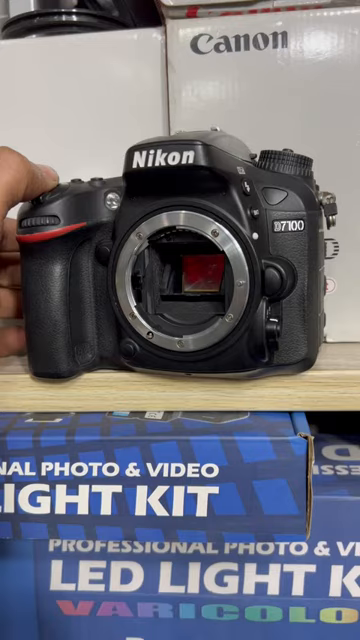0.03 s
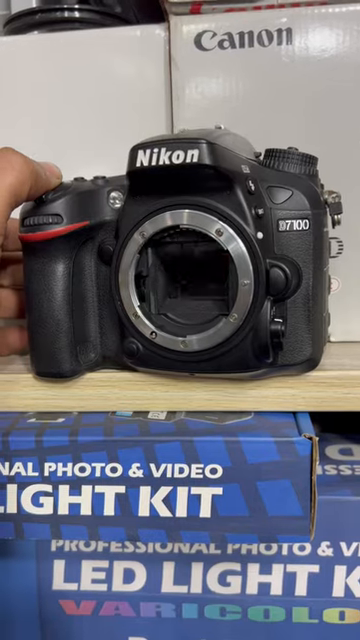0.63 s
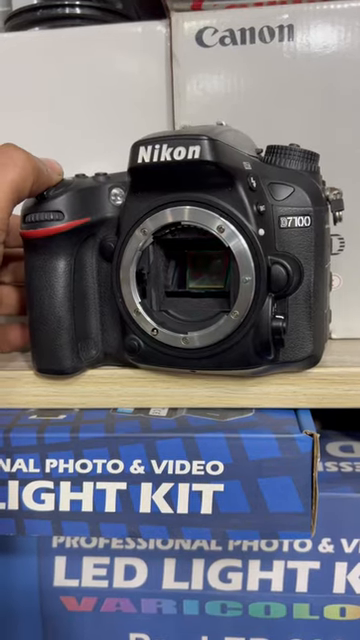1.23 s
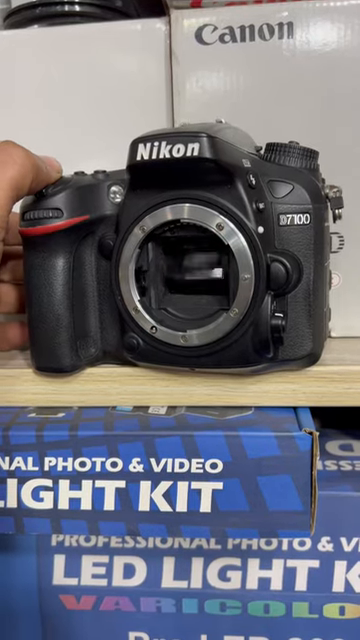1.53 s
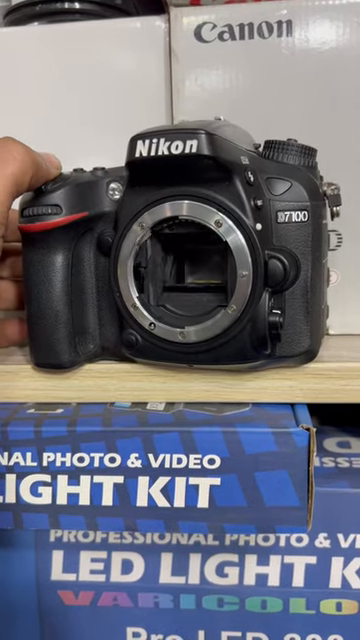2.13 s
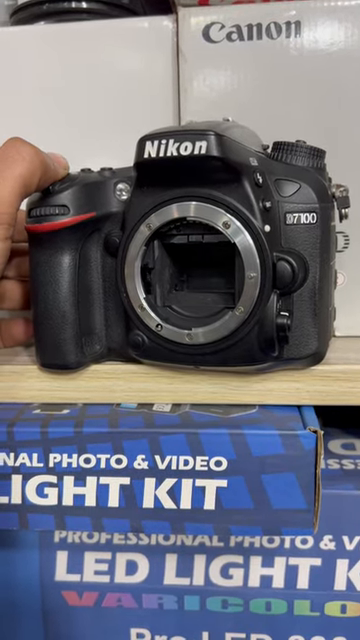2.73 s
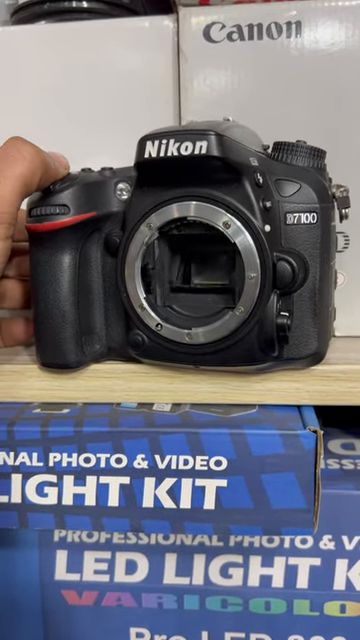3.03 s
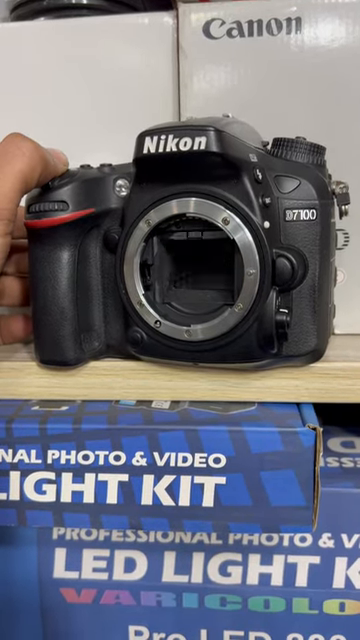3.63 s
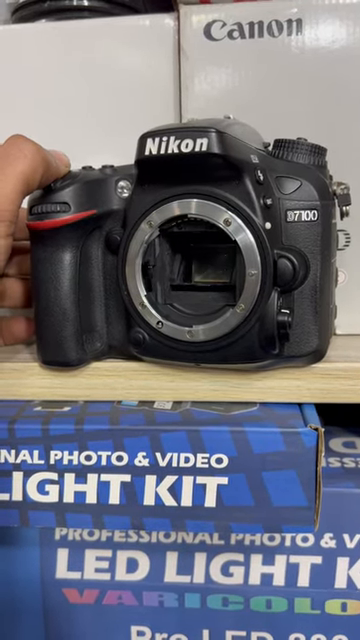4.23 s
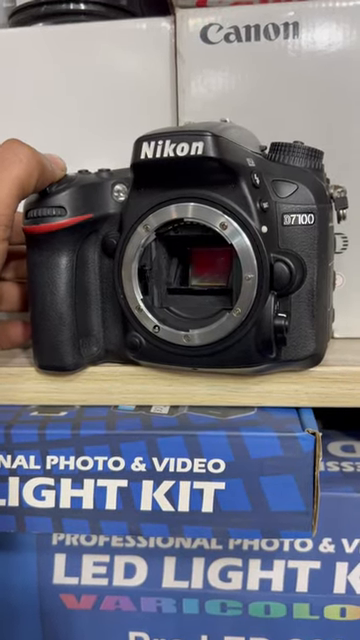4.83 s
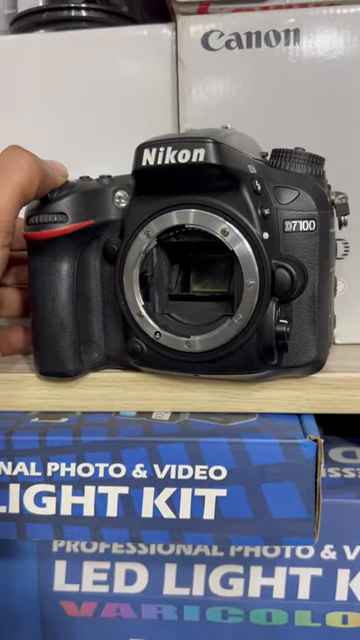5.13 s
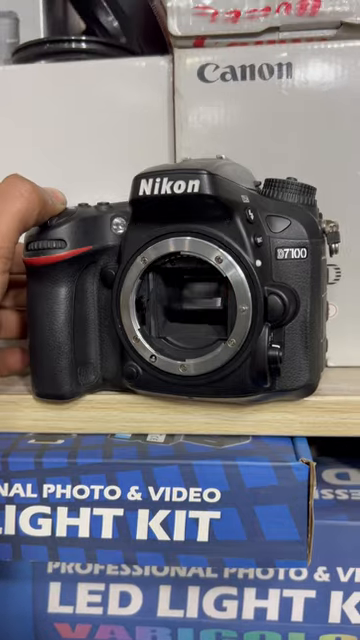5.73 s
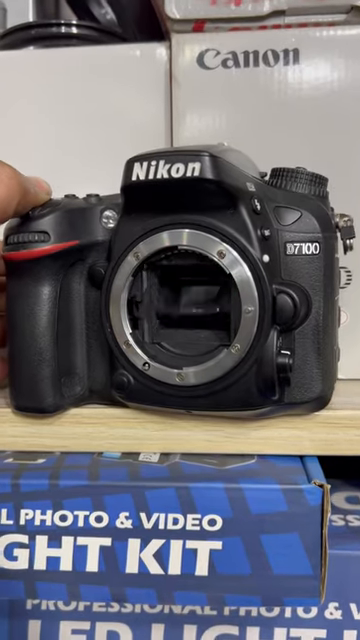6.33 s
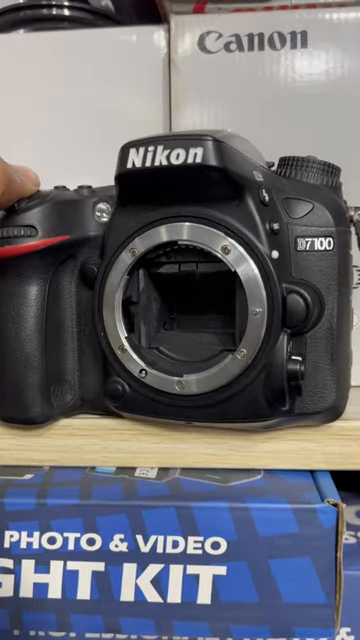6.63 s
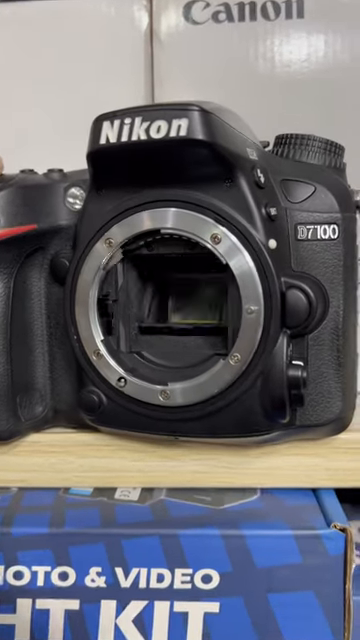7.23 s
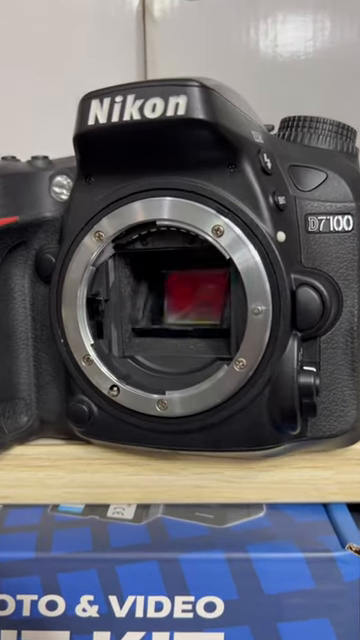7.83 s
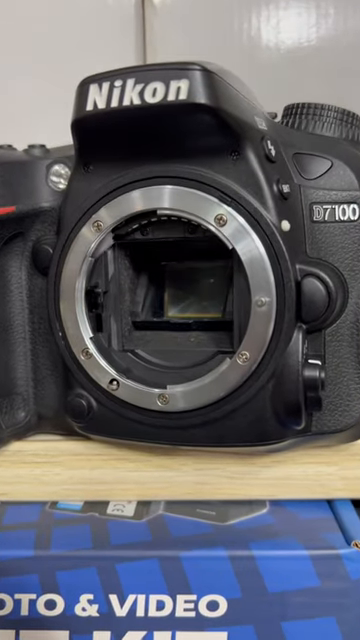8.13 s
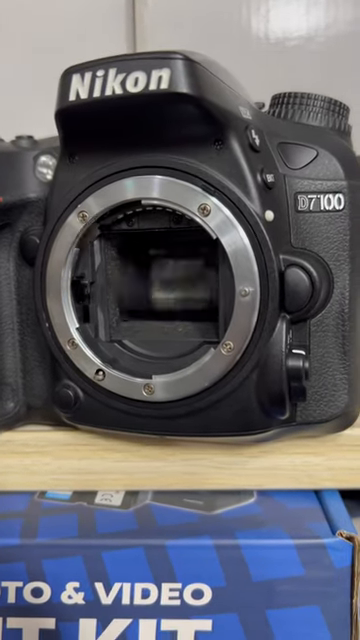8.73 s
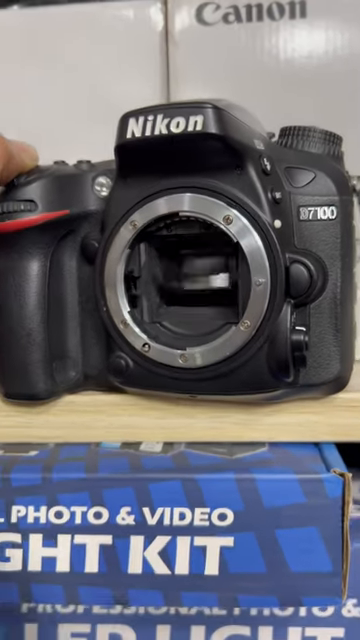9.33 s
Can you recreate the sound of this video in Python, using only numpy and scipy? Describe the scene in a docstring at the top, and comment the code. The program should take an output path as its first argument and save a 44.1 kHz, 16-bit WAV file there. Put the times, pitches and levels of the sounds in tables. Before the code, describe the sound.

A close camera mirror and shutter clack in a rapid, steady burst over a faint traffic rumble in a small shop.

```python
"""A hand-held reflex camera without a lens shoots a long burst, close by in a small shop.
In every frame a motor trips the mirror up, two shutter curtains snap, the mirror falls and the gears
cock and latch again. Each blow is a short rattle ringing through the struck part, over a low ring of
body and shelf. Street rumble comes through the walls, one engine goes by, and a faint squeal comes late."""
import sys
import numpy as np
from scipy import signal
from scipy.fft import rfft, irfft, next_fast_len
from scipy.io import wavfile
from scipy.ndimage import uniform_filter1d

SR = 44100
rng = np.random.default_rng(int(sys.argv[2]) if len(sys.argv) > 2 else 0)


def transcribe(u):
    """Save the signal u as a 16-bit wav file named by the first command-line argument.

    u: samples, shape (n,) or (channels, n), limited to [-1, 1]; the rate is SR.
    q: integer samples, one column per channel.
    """
    v = np.clip(np.atleast_2d(u).T, -1, 1)
    q = np.round(v * 32767).astype(np.int16)
    wavfile.write(sys.argv[1], SR, q)


N = 422478
FRAME_COUNT = 54


def amp(db):
    """Decibels to gain."""
    return 10 ** (np.asarray(db) / 20)


def unit(x):
    """Scale to rms 1."""
    return x / np.sqrt(np.mean(x ** 2) + 1e-20)


def along(points, hz):
    """Read a curve of (Hz, value) points on a log frequency axis."""
    knots, values = np.transpose(points)
    return np.interp(np.log(hz + 1), np.log(knots + 1), values)


def curves(rows):
    """Automation: one value per sample for each column after the time."""
    times, *columns = np.transpose(rows)
    return [np.interp(np.arange(N) / SR, times, column) for column in columns]


def filtered(x, response):
    """Filter by a complex response, given as a function of Hz."""
    size = next_fast_len(N + SR // 2)
    return irfft(rfft(x, size) * response(np.fft.rfftfreq(size, 1 / SR)), size)[..., :N]


def noise(spectrum):
    """Two unrelated noises of rms 1 with the given colour."""
    return unit(filtered(rng.standard_normal((2, N)), lambda hz: amp(along(spectrum, hz))))


def add(track, start_s, sound):
    """Mix a sound into a track."""
    i = max(round(start_s * SR), 0)
    track[..., i:i + sound.shape[-1]] += sound[..., :max(N - i, 0)]


def frame_times(first_s=.0509, period_s=.177551, slowing_s=5.24e-6, jitter_s=.0002):
    """The beat of the burst: each period is a touch longer than the last as the drive tires."""
    k = np.arange(FRAME_COUNT)
    beats = first_s + period_s * k + slowing_s * k * (k - 1) / 2
    return beats + jitter_s * rng.standard_normal(FRAME_COUNT)


def stroke(ms, length_ms, attack_ms=6.2, surge_db=4, surge_ms=6.2, release_db_per_ms=1):
    """Load of one motor stroke: it surges to get its parts moving, holds and runs down."""
    extra_db = surge_db * np.exp(-np.maximum(ms - attack_ms, 0) / surge_ms)
    release_db = release_db_per_ms * np.maximum(ms - length_ms, 0)
    return np.clip(ms / attack_ms, 0, 1) * amp(extra_db - release_db)


# Trip the mirror, wind, cock. Each row: start in ms from the beat, length in ms, held level in dB.
MOTOR_STROKES = [(-25.5, 40.8, -32.5), (38, 32, -32), (68, 27.8, -31.5)]
# Colour of the gear rasp. Each row: frequency in Hz, level in dB.
GEAR_COLOUR = [(250, -15), (480, -13), (750, -2), (950, -7.5), (1400, -1.5), (1900, 4.5), (2600, 0.5),
               (3600, -7.5), (5300, -11), (6400, 3), (8000, -6), (9200, -8), (10500, -11.5), (15500, -15)]
# Gear tones. Each row: centre in ms from the beat, half length in ms, pitch in Hz, level in dB.
GEAR_WHINES = [(-4.5, 8.9, 3000, -40.5), (-3, 9, 1860, -46), (73, 7, 8600, -45.5)]


def motor(frames):
    """Gear teeth rasp under the motor's load, and sing briefly where it runs free."""
    load, whine = np.zeros(N), np.zeros(N)
    t = np.arange(-.03 * SR, .14 * SR) / SR
    ms = t * 1000
    cycle = np.max([amp(db) * stroke(ms - start, length) for start, length, db in MOTOR_STROKES], axis=0)
    for beat in frames:
        add(load, beat + t[0], cycle)
        for centre_ms, half_ms, hz, db in GEAR_WHINES:
            detuned_hz = hz * (1 + 0.0055 * rng.normal())
            tone = np.sqrt(2) * np.sin(2 * np.pi * (detuned_hz * t + rng.random()))
            swell = np.exp(-((ms - centre_ms) / half_ms) ** 4)
            add(whine, beat + t[0], amp(db) * swell * tone)
    teeth_db = 2.6 * unit(uniform_filter1d(rng.standard_normal(N), size=40))
    return load * unit(amp(teeth_db)) * noise(GEAR_COLOUR) + whine


def part_response(resonances, bass_lag_ms=2.1, bend_hz=804, size=2048):
    """Spectrum of a struck part's ring, energy 1; bending waves bring the bass late."""
    hz = np.fft.rfftfreq(size, 1 / SR) + 1
    power = sum(amp(db) ** 2 / (1 + ((hz - centre * centre / hz) / width) ** 2)
                for centre, width, db in resonances)
    cepstrum = irfft(np.log(power / power.mean() + 1e-9) / 2)
    fold = 1 + np.sign(size // 2 - np.arange(size))  # minimum phase: the ring follows the hit
    fold[0] = 1
    bend = 2 * np.pi * bass_lag_ms / 1000 * bend_hz * np.arctan(hz / bend_hz)
    return np.exp(rfft(cepstrum * fold) - 1j * bend)


def chatter(decay_ms, fresh, size=2048):
    """Spectra (frames, 2, Hz) of a contact's colourless rattle; fresh sets how much each frame varies."""
    whiten = lambda z: z / (np.abs(z) + 1e-20)
    fade = np.exp(-np.arange(size) / SR * 1000 / decay_ms)
    force = fade * (rng.standard_normal((2, size)) + fresh * rng.standard_normal((FRAME_COUNT, 2, size)))
    for _ in range(3):  # flatten the colour while keeping the hit short
        force = irfft(whiten(rfft(force))) * np.sqrt(fade)
    return whiten(rfft(force))


# Brightness of the rising mirror's slap. Each row: time in seconds, treble shelf gain in dB.
SLAP_TREBLE = [(0, 2), (3.3, -5), (5.3, -3), (9, -.5)]


def slap_colour(frames, scatter_db=1.2, shelf_hz=9500, bands=12, size=2048):
    """EQ (frames, 1, Hz) for each slap: the mirror never lands quite the same way."""
    hz = np.fft.rfftfreq(size, 1 / SR)
    knots = np.geomspace(500, 16000, bands)
    draws = rng.standard_normal((FRAME_COUNT, bands))
    ripple = np.array([along(np.transpose([knots, draw]), hz) for draw in draws])
    shelf = 1 - 1 / (1 + (hz / shelf_hz) ** 8)
    treble_db = np.interp(frames, *np.transpose(SLAP_TREBLE))[:, None] * shelf
    return amp(scatter_db * ripple + treble_db)[:, None]


# Resonances of the struck parts; OPENING and CLOSING are the two shutter curtains.
# Each row: frequency in Hz, width in Hz, level in dB.
LEVER = [(715, 320, -11.5), (1060, 120, -10), (1720, 120, 5.5), (2030, 240, -1), (2510, 130, -1.5),
         (3140, 600, -6.5), (6100, 800, -2.5), (9400, 1050, 0)]
MIRROR_UP = [(459, 106, 0.5), (595, 95, -1), (1138, 230, 0), (1700, 74, -3), (2300, 310, -7.5),
             (3714, 410, -3.5), (5000, 1000, -12.5), (6650, 740, -5), (7340, 220, 0.5), (8500, 1040, -6.5),
             (13900, 4100, -9.5)]
CATCH = [(6760, 1600, 3), (9200, 900, 2), (13500, 3500, -6)]
OPENING = [(1460, 220, -1.5), (1990, 72, 0.5), (2370, 250, 2.5), (5370, 150, -2.5), (6160, 260, -7),
           (7350, 240, -4.5), (8900, 230, -1.5), (11200, 1300, -11), (14000, 3000, -12.5)]
CLOSING = [(600, 335, -6.5), (1284, 82, -4), (1590, 350, -8), (2050, 160, -7), (4010, 180, -5),
           (4610, 310, -7.5), (5480, 270, -5), (6180, 190, -4.5), (7160, 470, 2.5), (9090, 240, -3),
           (13780, 2900, -16.5)]
MIRROR_DOWN = [(743, 140, -6), (1310, 100, -5.5), (1690, 62, 1), (2280, 690, -7.5), (3840, 1060, -7.5),
               (6800, 1040, 0), (8750, 590, -2.5), (12400, 4600, -11)]
CUSHION = [(438, 134, -1.5), (580, 81, -1.3), (750, 64, 0.75)]
LATCH = [(990, 240, -2.5), (1310, 140, 0), (2100, 180, -3.5), (2400, 140, 2), (5800, 190, -10),
         (6760, 1400, -13.5), (9050, 860, -7.5), (13780, 1700, -46)]
# The kit of parts. Each entry: part name, its resonances.
PARTS = {"lever": LEVER, "up": MIRROR_UP, "open": OPENING, "close": CLOSING, "down": MIRROR_DOWN, "cushion":
         CUSHION, "catch": CATCH, "latch": LATCH}
# The hits of one frame. Each row: part, start in ms from the beat, base level in dB,
# rattle decay in ms, timing scatter in ms.
CONTACTS = [("lever", -18, -6.5, .6, .3), ("lever", -15.5, -8.5, 0.94, 0.33), ("down", 3.1, 0, 1.3, .15),
            ("up", 4.2, 9.1, 1.7, .3), ("catch", 7.5, -3, 3.3, .5), ("catch", 27, -6, 3, .2),
            ("open", 27.3, 4.9, 1.28, .06), ("close", 39.8, 7.14, 0.59, .05),
            ("close", 40.9, 7.4, 1.54, .06), ("down", 70.6, 0, 0.86, 0.11), ("cushion", 70.8, -3, 0.75, .1),
            ("down", 74.4, 1.2, 0.88, .2), ("down", 76.5, 1.7, 3, .4), ("down", 84.2, -18, 2.2, 0.57),
            ("latch", 95, -1.7, 1.51, .3), ("lever", 103.2, -14.5, 1.27, .5)]


def blows(frames, clack_samples=1500):
    """Levers, mirror and curtains hit their stops in the same order in every frame."""
    slap_start_db, slap_fall_db_per_s = 0.76, 0.16  # the rising mirror slowly eases off
    snap_soft_db, snap_settle_s = 3, 0.91  # the closing curtain starts soft, then hits evenly
    track = np.zeros((2, N))
    bodies = {part: part_response(resonances) for part, resonances in PARTS.items()}
    bodies["up"] = bodies["up"] * slap_colour(frames)
    for part, ms, db, decay_ms, scatter_ms in CONTACTS:
        rattle = chatter(decay_ms, fresh=.3 + 1.31 * scatter_ms)  # loose contacts repeat less exactly
        clacks = irfft(rattle * bodies[part])[..., :clack_samples]
        for beat, clack, (late, hard) in zip(frames, clacks, rng.standard_normal((FRAME_COUNT, 2))):
            slap_db = slap_start_db - slap_fall_db_per_s * beat + hard
            snap_db = .5 * hard - snap_soft_db * np.exp(-beat / snap_settle_s)
            accent_db = {"up": slap_db, "close": snap_db}.get(part, 1.8 * scatter_ms * hard)
            add(track, beat + (ms + scatter_ms * late) / 1000, amp(db + accent_db) * clack)
    return track


# Low modes of body and shelf. Each row: pitch in Hz, base level in dB, seconds to fall 60 dB.
BODY_MODES = [(229, -47, 0.38), (409, -50.5, 0.08), (572, -44, 0.076), (744.4, -38, 0.11)]


def body_ring(frames):
    """The mirror's two blows and the closing curtain leave the body and the shelf ringing low."""
    track, t = np.zeros(N), np.arange(SR // 3) / SR
    attack = 1 - np.exp(-t / 0.0011)
    for beat in frames:
        for after_s, hit_db in [(.008, 3), (.043, 1), (.075, 2)]:  # mirror up, curtain, mirror down
            ring = sum(amp(hit_db + db - 60 * t / t60) * np.sin(2 * np.pi * (hz * t + rng.random()))
                       for hz, db, t60 in BODY_MODES)
            add(track, beat + after_s, ring * attack)
    return track


# Decay of the shop's reverb. Each row: frequency in Hz, seconds to fall 60 dB.
SHOP_DECAY = [(300, 0.26), (2000, 0.22), (7000, 0.28), (15000, 0.17)]


def shop_reverb(source, frames, build_s=0.002, tail_count=4):
    """A short room tail; it drifts from frame to frame as the camera moves."""
    hz, t, spectra = signal.stft(rng.standard_normal((tail_count, 2, SR // 3)), SR, nperseg=256)
    colour = amp(along([(150, 5.5), (2000, 1), (7000, -1.5), (15000, -1.5)], hz))
    decay = amp(-60 * t / along(SHOP_DECAY, hz)[:, None])
    tails = signal.istft(spectra * colour[:, None] * decay, SR, nperseg=256)[1]
    tails *= 1 - np.exp(-(np.arange(tails.shape[-1]) / SR / build_s) ** 2)
    tails /= np.linalg.norm(tails, axis=-1, keepdims=True)
    draws = rng.standard_normal((tail_count, FRAME_COUNT))
    sends = np.array([np.interp(np.arange(N) / SR, frames, draw) for draw in draws])
    sends /= np.linalg.norm(sends, axis=0)  # equal-power crossfade between the tails
    return sum(signal.oaconvolve((source * send)[None], tail, axes=1)[:, :N]
               for send, tail in zip(sends, tails))


# Swell of the traffic. Each row: time in seconds, level in dB.
RUMBLE_LEVEL = [(0, -48), (.3, -41), (2.6, -42), (3.3, -39.5), (4.6, -40.5), (5.7, -39.5), (6.5, -38),
                (7.8, -40), (9.5, -41)]
# Colours of the traffic and of the shop air. Each row: frequency in Hz, relative level in dB.
RUMBLE_COLOUR = [(20, -36), (32, -18), (48, -5), (65, -3.5), (90, 2), (135, -3), (170, -11.5), (300, -21),
                 (700, -60)]
AIR_COLOUR = [(60, -15), (250, 0.5), (1000, -18), (3000, -4), (15000, -31)]


def street_and_air():
    """The bed: traffic rumbles through the walls and the shop air hisses faintly."""
    rumble_db, = curves(RUMBLE_LEVEL)
    return amp(rumble_db) * noise(RUMBLE_COLOUR) + amp(-52.5) * noise(AIR_COLOUR)


# The engine's pass-by. Each row: time in seconds, firing rate in Hz, level in dB.
ENGINE_PASS = [(2.7, 86, -51), (3.0, 88.4, -37.5), (3.3, 90.6, -31), (3.5, 92.5, -31.5), (3.6, 91.7, -45),
               (3.7, 92.6, -34), (4.0, 89.4, -40), (4.25, 86.7, -62)]
# Its partials. Each row: multiple of the firing rate, relative level in dB.
ENGINE_ORDERS = [(.5, -15), (1, 2), (1.5, -16), (3, -21)]


def passing_engine():
    """An engine's firing makes a low hum that rises and falls in pitch and level as it goes by."""
    firing_hz, level_db = curves(ENGINE_PASS)
    phase = 2 * np.pi * np.cumsum(firing_hz) / SR
    return amp(level_db) * unit(sum(amp(db) * np.sin(order * phase) for order, db in ENGINE_ORDERS))


# A faint, thin squeal. Each row: pitch in Hz, relative level in dB.
SQUEAL_TONES = [(2762, 0), (3235, -2)]


def squeal(centre_s=7.9, half_s=0.27, level_db=-45):
    """Two thin, slightly unsteady tones rise and fade in the background."""
    swell = np.exp(-((np.arange(N) / SR - centre_s) / half_s) ** 2)
    waver = unit(uniform_filter1d(rng.standard_normal(N), size=600))
    clock = np.cumsum(1 + 0.0059 * waver) / SR
    tones = sum(amp(db) * np.sin(2 * np.pi * hz * clock) for hz, db in SQUEAL_TONES)
    return amp(level_db) * swell * unit(tones)


# Stereo phase. Each row: frequency in Hz, lead of the left side in radians.
LEFT_LEAD = [(1200, -0.023), (4500, 0.42), (6300, -1.06), (8000, -0.99), (9200, -1.45), (15000, -1.5)]


def stereo_ports(pair, width):
    """Two microphone ports hear the bass alike; the top end differs and reaches the left one later."""
    def mid_side_gains(hz):
        angle = along(width, hz)
        return np.array([np.cos(angle), np.sin(angle)])

    mid, side = filtered(pair, mid_side_gains)
    left_right = np.array([mid + side, mid - side])
    return filtered(left_right, lambda hz: np.exp(.5j * along(LEFT_LEAD, hz) * np.array([[1], [-1]])))


# Closeness of the hand-held camera. Each row: time in seconds, gain in dB.
CLOSENESS = [(0, -0.23), (2, -0.2), (3, -0.74), (5, -0.65), (6.3, 0), (7.5, 1), (8.5, 0.6), (9.5, -0.5)]
# Stereo width of the direct sound and of the ambience. Each row: frequency in Hz, mid/side angle in radians.
DIRECT_WIDTH = [(100, 0.016), (650, 0.092), (1400, 0.023), (3000, 0.17), (15000, 0.4)]
AMBIENT_WIDTH = [(90, 0.013), (250, 0.097), (600, 0.57), (2000, 0.21), (5000, 0.72)]


def scene(knock_hz=620, knock_growth=1.25):
    """The mechanism up front, the shop's answer and the street behind."""
    frames = frame_times()
    camera = blows(frames) + motor(frames) + body_ring(frames)
    near = amp(curves(CLOSENESS)[0])
    knock = filtered(camera, lambda hz: 1 / (1 + (hz / knock_hz) ** 4))
    direct = near * (camera + knock_growth * (near - 1) * knock)  # the low knock grows fastest up close
    ambience = amp(-13.0) * shop_reverb(camera[0], frames) + street_and_air() + passing_engine() + squeal()
    return stereo_ports(direct, DIRECT_WIDTH) + stereo_ports(ambience, AMBIENT_WIDTH)


def record(dry, ceiling=.92, top_hz=15950):
    """A fast fade-in as the burst begins, a soft clip on the highest peaks and a steep high cut."""
    opened = dry * np.clip((np.arange(N) / SR - .034) / .003, 0, 1)
    rounded = opened / (1 + np.abs(opened / ceiling) ** 8) ** (1 / 8)
    return filtered(rounded, lambda hz: 1 / (1 + (hz / top_hz) ** 200))


dry = scene()
out = record(dry)
transcribe(out)
```